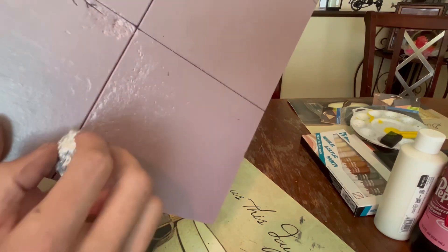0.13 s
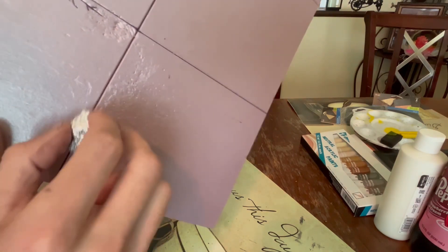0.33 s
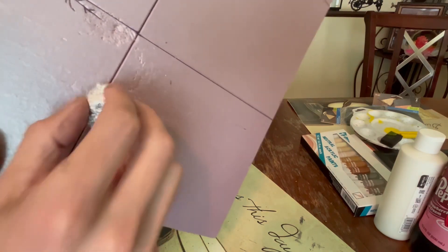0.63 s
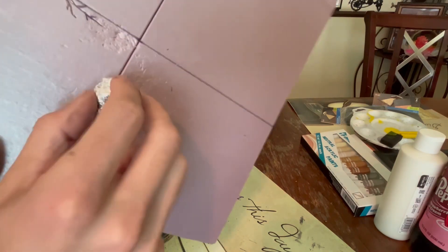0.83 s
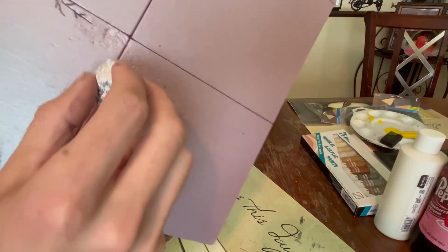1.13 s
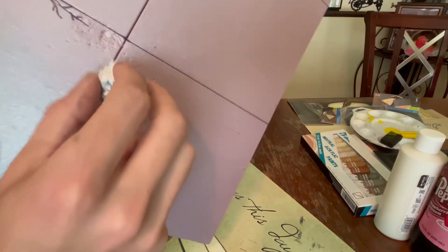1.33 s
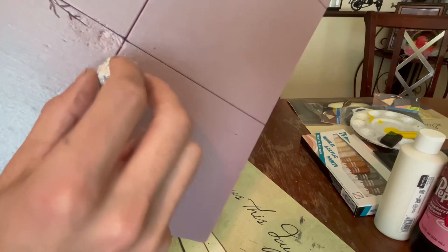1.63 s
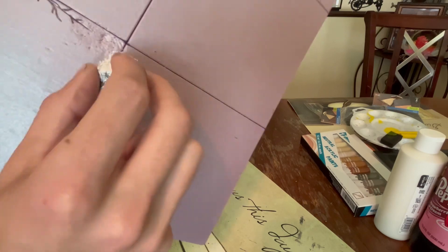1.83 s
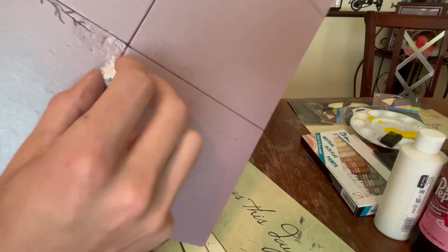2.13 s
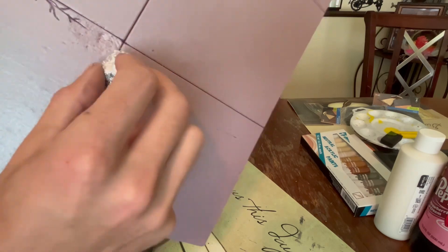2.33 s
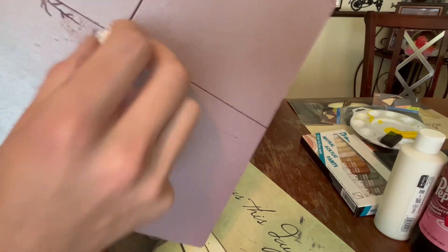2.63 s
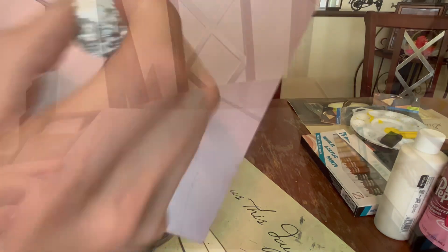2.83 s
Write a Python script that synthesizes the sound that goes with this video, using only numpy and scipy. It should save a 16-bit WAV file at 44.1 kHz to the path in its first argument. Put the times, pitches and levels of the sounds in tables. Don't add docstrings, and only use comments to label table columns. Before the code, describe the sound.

Steady run of crunchy foil taps on a hollow-sounding foam board, about five a second, indoors

```python
import sys
import numpy as np
from scipy import signal
from scipy.io import wavfile

SR = 44100
rng = np.random.default_rng(int(sys.argv[2]) if len(sys.argv) > 2 else 0)


def ratio_of_db(decibels):
    return 10 ** (np.asarray(decibels, float) / 20)


def dump_mix(stems):
    frames = np.atleast_2d(stems).T
    limited = np.clip(frames, -1, 1)
    pcm = np.round(limited * 32767).astype(np.int16)
    wavfile.write(sys.argv[1], SR, pcm)


N = 132300

# start_s, crunch_peak_db, boom_db, middle_modes_db, upper_modes_db
DABS = [(0.1018, -26, -26.5, -11, -8), (0.2931, -25.5, -27, 0, -11.5), (0.4863, -23.5, -27.5, 3.5, 2),
        (0.6547, -24, -27, 3, -6.5), (0.8312, -25, -24.5, -1, -8.5), (1.0357, -26, -21, -1, -6.5),
        (1.2445, -25.5, -21, -1, -3.5), (1.4794, -24, -19.5, -0.5, -5.5), (1.6927, -23.5, -19, -0.5, 1),
        (1.9151, -23.5, -19, -2, -10), (2.1138, -22.5, -21.5, -1.5, -4.5), (2.3192, -25, -20, 1.5, -0.5),
        (2.4979, -28.5, -20, -2, -4.5), (2.6513, -21.5, -19, 1, -2.5)]
# pitch_hz, correlation
LIKENESS = [(60, 0.99), (200, 0.83), (400, 0.25), (700, -0.36), (4000, 0.5)]
BAND_EDGES_HZ = 22 * 2 ** np.arange(0, 9.6, 0.5)
LEFT_RIGHT = np.array([[1], [-1]])


def rms_one(x):
    return x / np.sqrt(np.mean(x ** 2) + 1e-20)


def at_hz(points, hz, axis=1):
    points = np.array(points)
    return np.interp(np.log(hz), np.log(points[:, 0]), points[:, axis])


def bands(x):
    for k, (low, high) in enumerate(zip(BAND_EDGES_HZ, BAND_EDGES_HZ[1:])):
        sos = signal.butter(2, [low, high], "band", fs=SR, output="sos")
        yield np.sqrt(low * high), signal.sosfilt(sos, x[k % 2])


def diffuse(mid, side, hz):
    alike = at_hz(LIKENESS, hz)
    return np.sqrt(1 + alike) * mid + np.sqrt(1 - alike) * side * LEFT_RIGHT


def strikes(start_s, level_db):
    out = np.full(N + SR, 1e-18)
    out[np.round(start_s * SR).astype(int)] = ratio_of_db(level_db)
    return out[:N]


def decay(x, t60_s):
    return signal.lfilter([1], [1, -ratio_of_db(-60 / (t60_s * SR))], x)


def mode(start_s, level_db, hz, t60_s):
    swell_ms = 1.7
    loss = ratio_of_db(-60 / (t60_s * SR))
    swell = np.exp(-1000 / (swell_ms * SR))
    turn = 2 * np.pi * hz / SR
    clicks = strikes(start_s, level_db)

    def ring(q):
        return signal.lfilter([0, q * np.sin(turn)], [1, -2 * q * np.cos(turn), q * q], clicks)

    return ring(loss) - ring(loss * swell)


def facets():
    clicks_per_s = 7200
    size = ratio_of_db(3.04 * np.minimum(rng.exponential(1, (3, N)), 4))
    sign = rng.choice([-1, 1], (3, N))
    present = rng.random((3, N)) < clicks_per_s / SR
    return rms_one(size * sign * present)


def rumble():
    # pitch_hz, level_db
    rumble_colour = [(15, -32), (25, -6), (130, -0.5), (504, -17.5), (846, -18.5), (1030, -34), (1490, -5),
                     (1730, -28), (9000, -63.5), (11700, -85), (19800, -120)]
    out = 0
    for hz, (mid, side) in bands(rng.standard_normal((2, 2, N + SR // 4))):
        out = out + ratio_of_db(at_hz(rumble_colour, hz)) * diffuse(mid, side, hz)
    return ratio_of_db(-45) * rms_one(out[:, -N:])


def room(x):
    # pitch_hz, level_db, t60_s
    room_ring = [(60.4, -37, 0.99), (150, -14.5, 0.22), (354, -13.5, 0.58), (756, -8, 0.21),
                 (1530, -1.5, 0.35), (13000, -15.5, 0.1)]
    first_wall_ms = 18
    t = np.arange(SR * 3 // 4) / SR
    tail = 0
    for hz, (mid, side) in bands(rng.standard_normal((2, 2, len(t)))):
        t60_s = at_hz(room_ring, hz, axis=2)
        fall = ratio_of_db(at_hz(room_ring, hz) - 60 * t / t60_s)
        even_energy = np.sqrt(np.log(1000) / (t60_s * SR))
        tail = tail + fall * even_energy * diffuse(mid, side, hz)
    tail = tail * np.clip(t * 1000 / first_wall_ms - 1, 0, 1)
    return signal.fftconvolve(x[None], tail, axes=1)[:, :N]


def ticks():
    # start_s, peak_db, length_ms
    foil_releases = [(0.1545, -53, 6.5), (0.3411, -50, 4.6), (0.5277, -52, 4.3), (0.7063, -58, 6.0),
                     (0.8844, -56, 4.3), (1.315, -58, 16), (1.362, -62, 7.2), (1.944, -50, 3.9),
                     (2.606, -50.5, 4.7), (2.6828, -44, 6.6), (2.8416, -63.5, 3.28)]
    low_hz, high_hz, own_share = 8000, 13700, 0.13
    t = np.arange(N) / SR
    shape = 1e-9
    for start_s, peak_db, length_ms in foil_releases:
        u = np.maximum(t - start_s, 0) * 1000 / length_ms
        shape = shape + ratio_of_db(peak_db + 0.5) * np.minimum(1.1 * u, 1) * np.exp(-u)
    clicks = facets()
    sos = signal.butter(2, [low_hz, high_hz], "band", fs=SR, output="sos")
    return rms_one(signal.sosfilt(sos, clicks[0] + own_share * clicks[1:])) * shape


def board():
    # pitch_hz, left_db, t60_s, signed share on the right
    boom_modes = [(55, -15, .115, .62), (150, 2.5, .02, .56), (155, -18, .13, .62), (305, -6, .05, .82),
                  (367, -8.5, .04, 1.0), (640, -3.5, .013, 1.0)]
    arrival_ms = [5.9, 7.2, 5.2, 3.05, 2.0, 1.05]
    # pitch_hz, left_db, t60_s, signed share on the right
    knock_modes = [(762, 6.5, 0.017, -0.97), (1093, -26.5, 0.056, 1), (1221, -19.5, 0.052, -0.3),
                   (1464, -13, 0.013, 0.75), (1681, -19.5, 0.019, 0.73)]
    boom_gain_db, boom_scatter_db = 19.5, 0.5
    knock_gain_db, knock_scatter_db = 12, 2.5
    soft_below_db, soft_lag_ms_per_db = -24, 0.15
    right_later = int(0.53 * SR / 1000)

    start_s, _, boom_db, middle_db, upper_db = np.transpose(DABS)
    lag_ms = soft_lag_ms_per_db * np.maximum(soft_below_db - boom_db, 0)
    out = 0
    for k, (hz, db, t60_s, right) in enumerate(boom_modes):
        level_db = boom_gain_db + boom_db + db + boom_scatter_db * rng.standard_normal(len(start_s))
        if k in (3, 4):
            level_db = level_db + middle_db
        if k == 5:
            level_db = level_db + upper_db
        ring = mode(start_s + (lag_ms + arrival_ms[k]) / 1000, level_db, hz, t60_s)
        far_side = np.roll(ring, right_later) if k == 5 else ring
        out = out - (-1) ** k * np.array([ring, right * far_side])

    slack_hz, slack_t60_s, slack_delay_ms = 284.4, 0.13, 2.8
    hand_loss_db = 2.5 * np.maximum(boom_db - soft_below_db, 0)
    slack_db = boom_gain_db + boom_db - 18.5 - hand_loss_db
    out = out + mode(start_s + (lag_ms + slack_delay_ms) / 1000, slack_db, slack_hz, slack_t60_s)

    for k, (hz, db, t60_s, right) in enumerate(knock_modes):
        scatter, late = rng.standard_normal((2, len(start_s)))
        level_db = knock_gain_db + boom_db + upper_db + db + knock_scatter_db * scatter
        ring = mode(start_s + abs(late) / 2000, level_db, hz, t60_s)
        out = out + (-1) ** k * np.array([[1], [right]]) * ring
    return out


def crunch():
    # pitch_hz, level_db (per Hz)
    crunch_colour = [(530, -31), (900, 3), (2140, -9.5), (4200, -9), (5750, -19.5), (8250, -25),
                     (10800, -9.5), (13400, -20.5), (16000, -37)]
    # pitch_hz, left_over_right_db, unshared part, right_lag_ms
    crunch_pan = [(1000, 5, .6, .4), (2400, 4.5, .7, .35), (4400, 5.5, .7, .3), (7000, -3, .4, .03),
                  (15000, 0, .15, .025)]
    # pitch_hz, level_db (re crunch), t60_s
    wall_return = [(900, -24, 0.18), (1780, -14.5, 0.22), (3500, -18, 0.47), (5200, -16.5, 0.44),
                   (8000, -22, 0.45), (13000, -32.5, 0.8)]
    bite_t60_s, settle_t60_s, settle_db = 0.017, 0.18, -17.5
    rise_t60_s = 0.4 * np.log(1000) / 1000
    wall_build_up_s = 0.052
    earlier_dab_s, earlier_dab_db = 0.095, -24

    start_s, peak_db = np.transpose(DABS)[:2]
    hits = strikes(start_s, peak_db - 0.5)
    bite = decay(hits, bite_t60_s) - decay(hits, rise_t60_s)
    shape = bite + ratio_of_db(settle_db) * decay(hits, settle_t60_s)
    raw = [np.vstack([facets() * shape + 1e-18, rng.standard_normal((2, N))]) for _ in range(2)]
    since_earlier_s = np.arange(N) / SR + earlier_dab_s

    out, power = 0, 0
    for hz, (both, left, right, *hiss) in bands(raw):
        gain = ratio_of_db(at_hz(crunch_colour, hz)) * (hz > 700)
        own = at_hz(crunch_pan, hz, axis=2)
        late = np.roll(both, int(round(at_hz(crunch_pan, hz, axis=3) * SR / 1000)))
        balance = ratio_of_db(at_hz(crunch_pan, hz) * LEFT_RIGHT / 2)
        near = balance * np.array([both + own * left, late + own * right]) / np.hypot(1, own)
        t60_s = at_hz(wall_return, hz, axis=2)
        before = ratio_of_db(earlier_dab_db - 60 * since_earlier_s / t60_s)
        walls = np.sqrt(decay(hits ** 2, t60_s / 2) + before ** 2) - decay(hits, wall_build_up_s)
        echo = ratio_of_db(at_hz(wall_return, hz)) * np.maximum(walls, 0) * hiss
        out = out + gain * (near + echo)
        power += gain ** 2 * hz / SR
    return out / np.sqrt(power)


def scene():
    near = board() + ticks()
    return near + crunch() + room(near[0]) + rumble()


def band_limit(x):
    return signal.sosfilt(signal.butter(12, 16640, fs=SR, output="sos"), x)


def record(dry):
    low_hz, top_hz = 32, 14100
    fade_s, fade_db = 0.15, -4.5
    low_cut = signal.butter(3, low_hz, "high", fs=SR, output="sos")
    high_cut = signal.butter(12, top_hz, fs=SR, output="sos")
    heard = signal.sosfilt(np.vstack([low_cut, high_cut]), dry)
    left_s = (N - np.arange(N)) / SR
    mix = heard * ratio_of_db(fade_db * np.clip(1 - left_s / fade_s, 0, 1))
    return band_limit(mix)


dry = scene()
out = record(dry)
dump_mix(out)
```